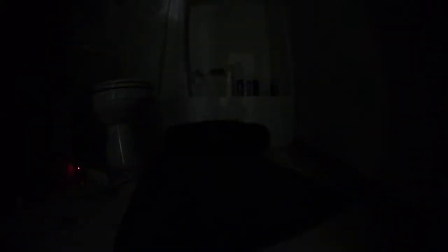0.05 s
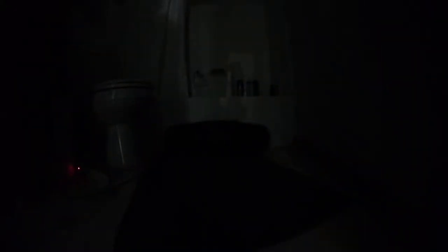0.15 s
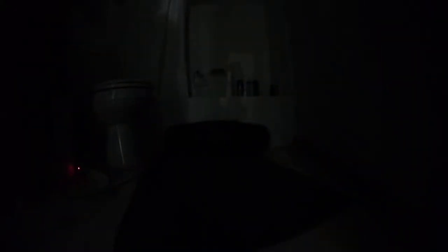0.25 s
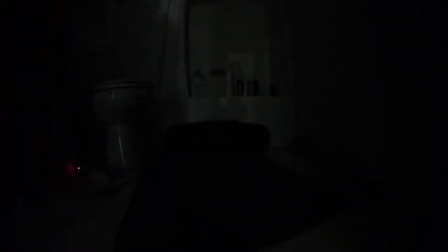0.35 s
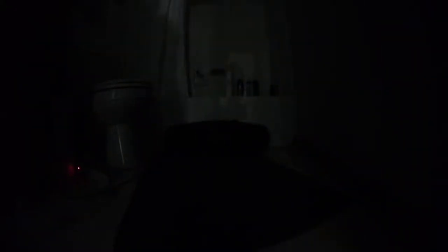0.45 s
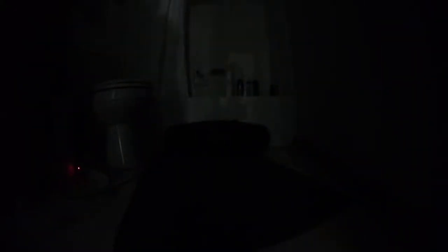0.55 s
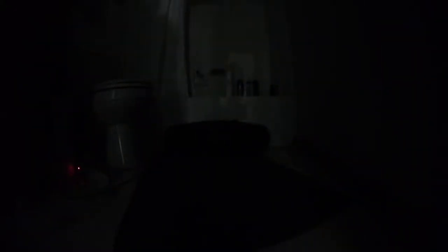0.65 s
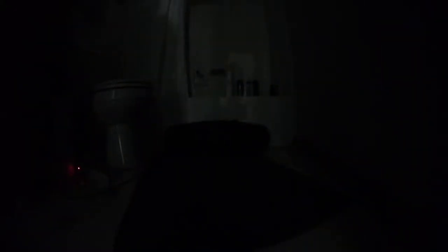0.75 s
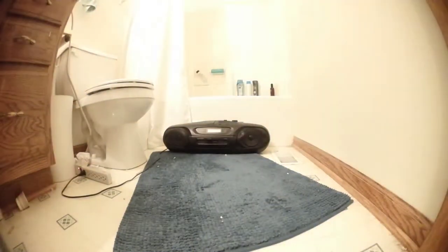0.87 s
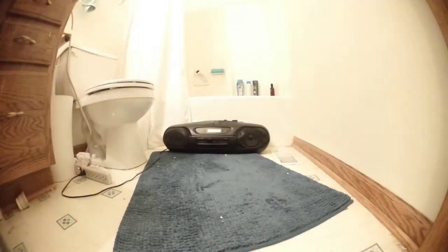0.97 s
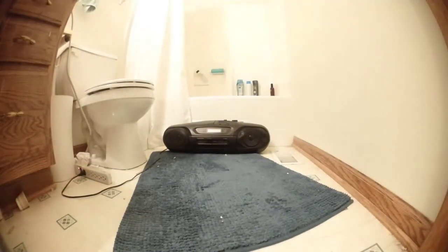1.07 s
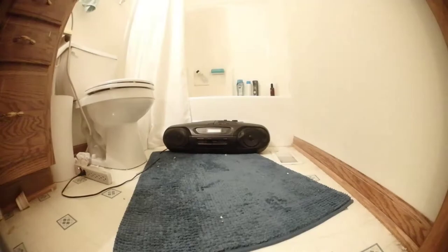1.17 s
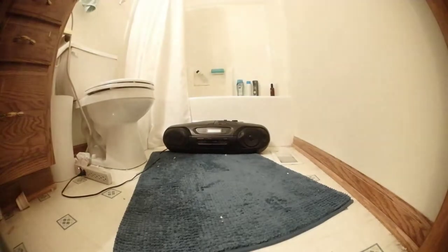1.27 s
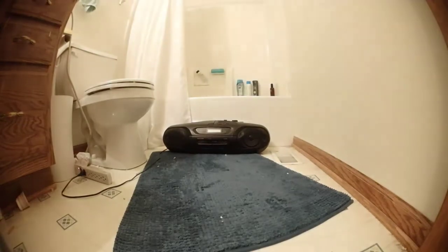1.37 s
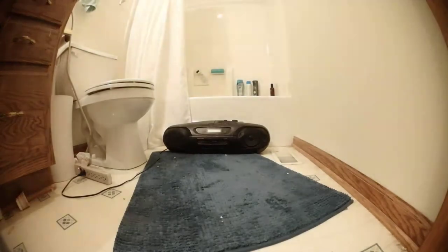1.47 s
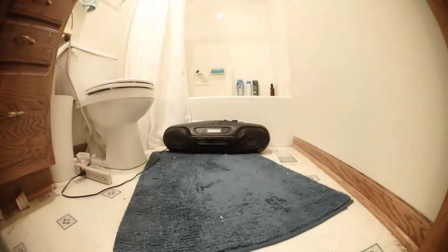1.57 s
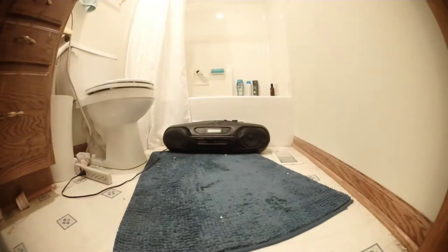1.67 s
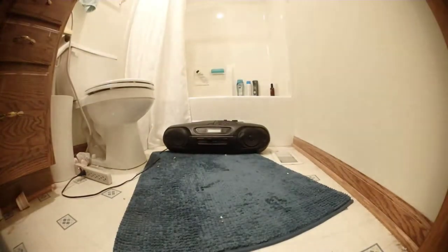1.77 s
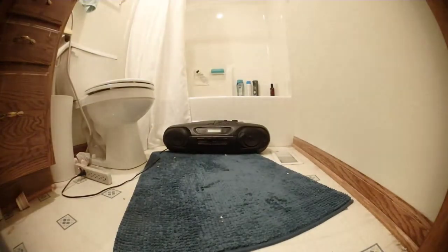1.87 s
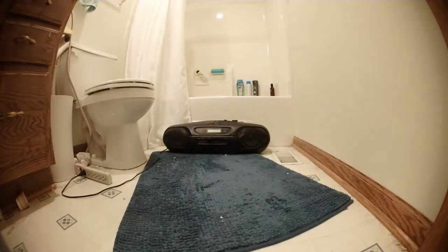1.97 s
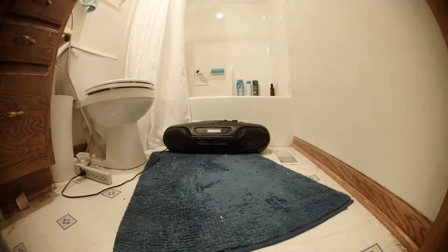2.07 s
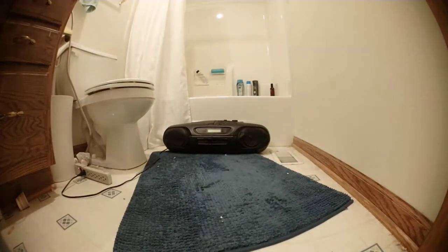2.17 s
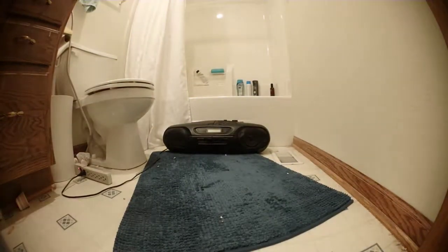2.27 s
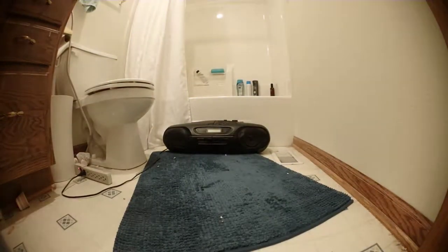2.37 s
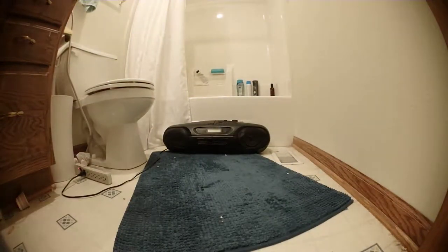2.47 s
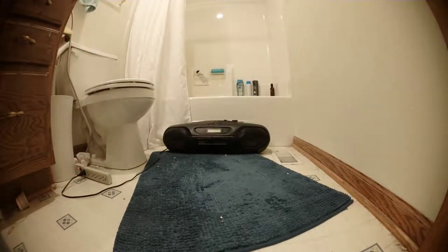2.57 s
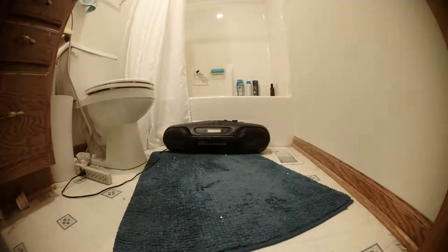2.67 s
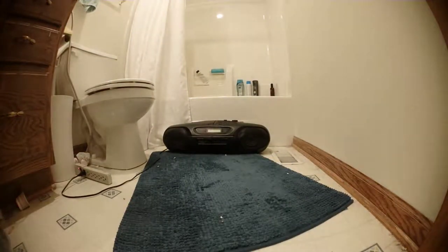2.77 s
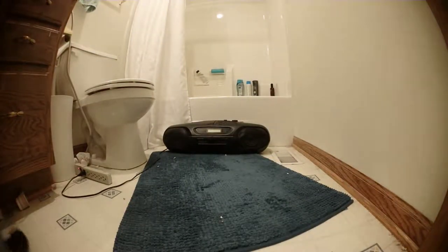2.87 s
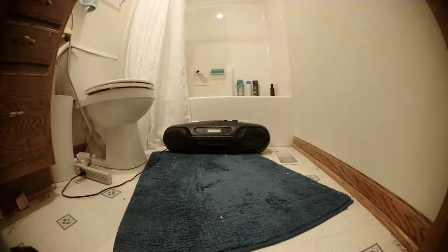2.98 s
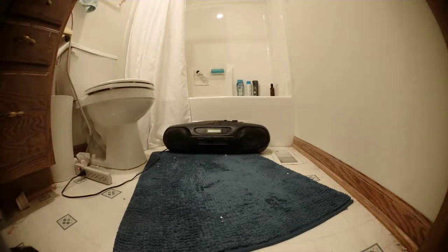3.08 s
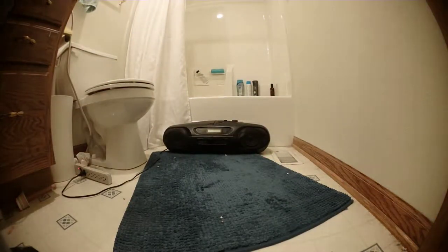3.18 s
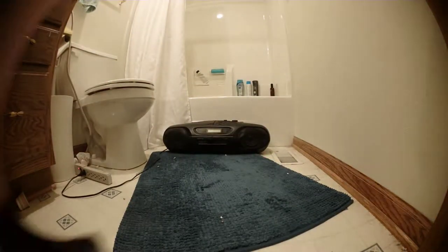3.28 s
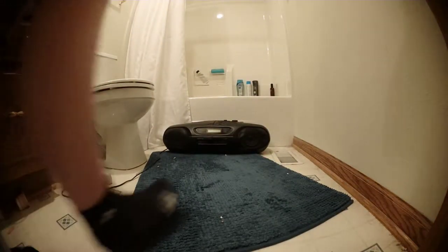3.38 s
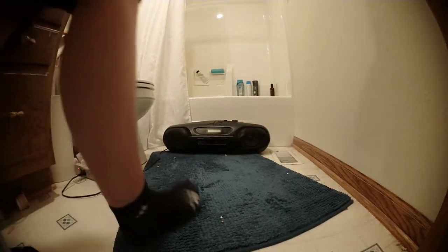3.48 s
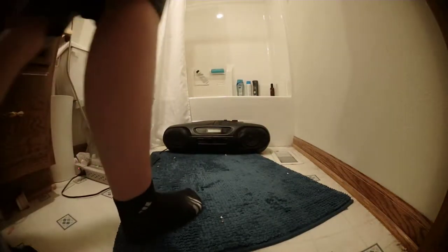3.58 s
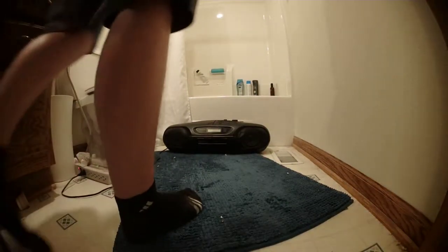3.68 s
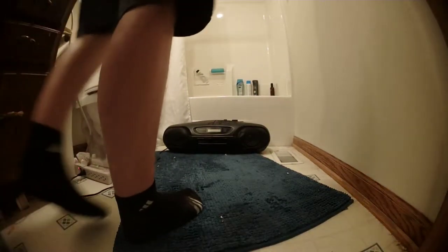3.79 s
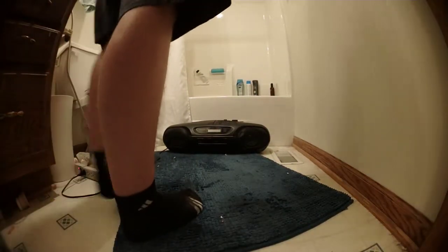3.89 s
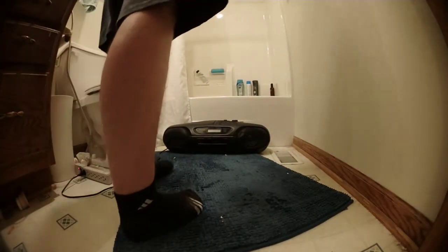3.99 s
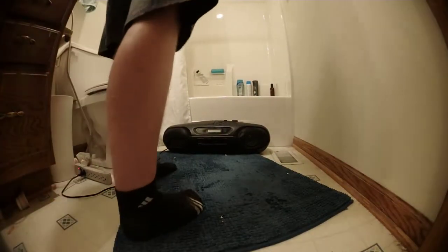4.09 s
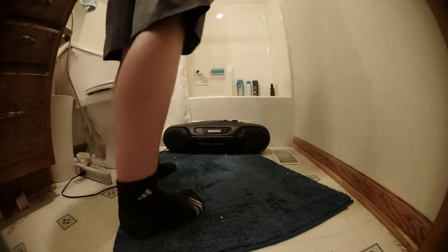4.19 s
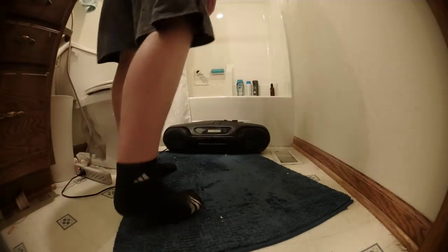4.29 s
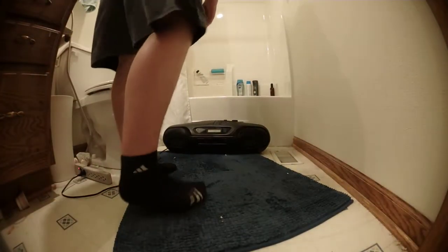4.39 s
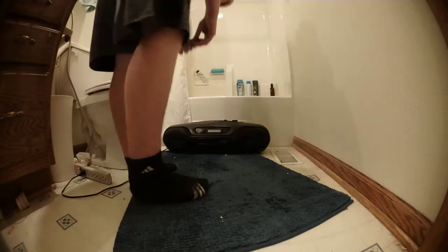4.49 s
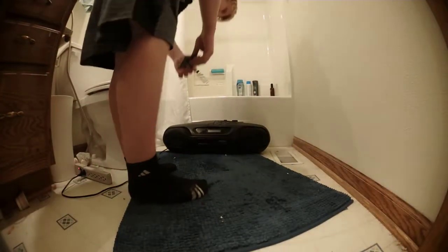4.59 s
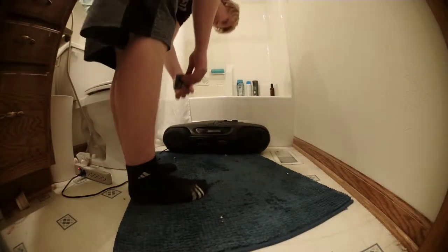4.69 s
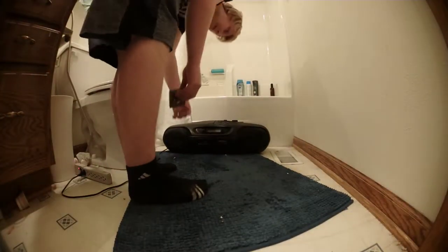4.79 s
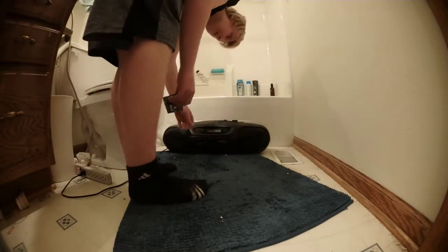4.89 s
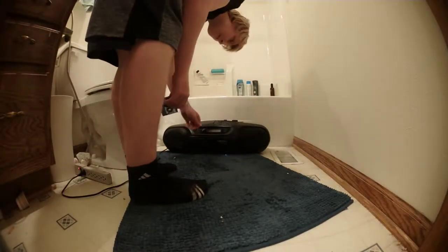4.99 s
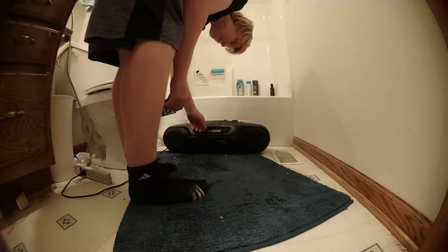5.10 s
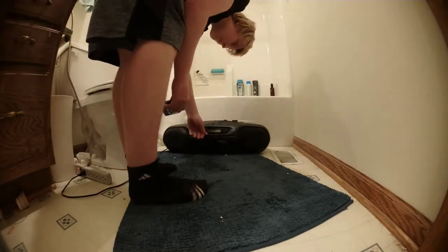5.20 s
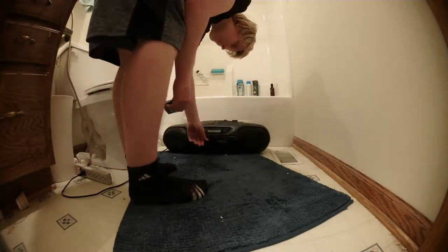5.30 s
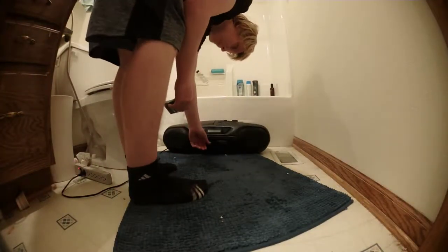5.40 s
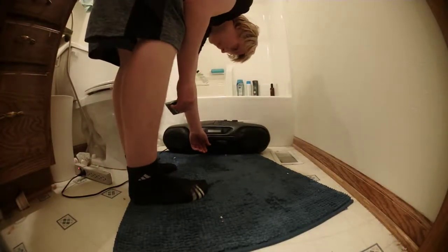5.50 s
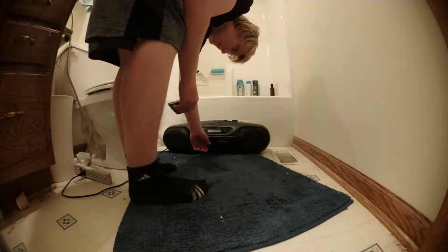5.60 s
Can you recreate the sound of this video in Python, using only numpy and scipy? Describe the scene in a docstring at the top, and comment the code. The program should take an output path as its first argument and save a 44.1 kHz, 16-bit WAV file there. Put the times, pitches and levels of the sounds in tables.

```python
"""A small tiled bathroom, heard from the floor: two hard plastic switches clack and the room rings.
Someone walks in on socks with rustling clothes and small clicks, then handles a plastic case.
Impacts are noise bursts with decaying reflections; the switches add decaying modes and the footfalls are damped sines.
Cloth and case are trains of tiny slips that follow the motion.
Under it lie a steady low rumble, hiss and a thin whine, made of filtered noise."""
import sys
import numpy as np
from scipy import signal
from scipy.fft import rfft, irfft
from scipy.io import wavfile
from scipy.ndimage import uniform_filter1d

SR = 44100
rng = np.random.default_rng(int(sys.argv[2]) if len(sys.argv) > 2 else 0)


def materialize(psi):
    """Save the field psi as 16-bit PCM at rate SR to the path in sys.argv[1].

    A 1-D psi becomes a single channel; in a 2-D psi each row is a channel.
    """
    bounded = np.clip(np.atleast_2d(psi).T, -1, 1)
    quanta = np.round(bounded * 32767).astype(np.int16)
    wavfile.write(sys.argv[1], SR, quanta)


N = 249165  # length in samples

# The two switches, a sharp one then a heavy one. Each row: time in seconds, level in dB, gain of the
# modes in dB, tilt of the modes in dB per octave, direct sound against reflections in dB, left-right in dB.
SWITCH_EVENTS = [(0.9206, -19, -24.5, 2, -5, 0.5), (1.555, -19, -19.5, 0, -9.5, 0.5)]
# Spectrum of the sharp clack. Each row: frequency in Hz, relative density in dB per Hz.
SHARP_SPECTRUM = [(50, -33), (130, -33), (310, -12.5), (440, -14), (760, -9.5), (1050, -10.5), (1450, 2),
                  (2350, -12), (3200, -8), (5400, -15), (7000, -30), (8600, -22), (9600, -34.5),
                  (13000, -41.5)]
# Spectrum of the heavy clack. Each row: frequency in Hz, relative density in dB per Hz.
HEAVY_SPECTRUM = [(50, -45), (120, -14), (300, -9), (430, -14.5), (640, -6.5), (1100, -8), (1480, 2.5),
                  (1820, -6), (2020, -16.5), (2850, -16), (3400, -10), (5600, -19.5), (6400, -34.5),
                  (8600, -33.5), (13000, -54)]
# Modes of wall and room after a clack. Each row: frequency in Hz, relative level in dB,
# 60 dB decay time in seconds (before the ceiling set in switches).
WALL_MODES = [(134, -12, 0.67), (306, -13.5, 0.27), (578, -4.5, 0.29), (623.6, -3, .38), (637.5, 1.5, 0.39),
              (648, -6.5, 0.24), (852, -5, 0.36), (947, -4, .38), (1142, -5.5, 0.31), (1258, -5.5, 0.36),
              (1261, -3, 0.34), (1422, -4, 0.48), (1458, 2, 0.19), (1496, 1, .2), (1505, -1.5, 0.22),
              (1680, -5, 0.17), (1764, 3, 0.14), (1840, -10, 0.14), (2100, -13.5, .2), (3300, -5, 0.24),
              (3440, -10.5, .32), (4160, -7, 0.26), (4662, -16.5, 0.19), (5340, -17, .22), (5480, -16, .18)]
# Small clicks of fingers, joints and plastic. Each row: time in seconds, level in dB, low edge in Hz,
# tilt in dB per octave, direct sound against reflections in dB, left-right in dB, resonance in Hz, its lift in dB.
CLICK_EVENTS = [ (0.199, -55, 4400, 5, -1.5, -2.5, 5540, 17),
                (0.251, -52.5, 1610, 2, -7.5, 0.5, 1820, 18.5), (0.889, -42, 1152, -8, -7.5, 0.5, 3480, 10),
                (2.403, -63, 1200, -4, -7, 0, 1430, 14), (2.613, -53.5, 1530, -0.5, 0.5, -3, 2250, -9),
                (2.743, -65, 1690, -9, -3, 9, 2000, 12), (3.131, -45, 1600, -3.5, 2.5, 1, 3310, 10),
                (3.2119, -43, 1080, -7, -4.5, 3.5, 1674, 15), (3.243, -61, 1320, -12, 8, 2, 1850, 11),
                (3.279, -55.5, 5000, 4, 3, 2, 8300, 10), (3.654, -55, 3100, 2, -10, 3, 3240, 17),
                (3.704, -40.5, 2070, 8, 1, 4, 3340, -3), (3.7662, -42.5, 1290, -4.5, -9, 1.5, 3324, 15.5),
                (3.93, -63, 2490, -5, -8, -1, 3340, 9), (4.207, -59.5, 1500, -5.5, -7, -3, 3700, 16),
                (4.403, -56.5, 3340, -7, -15, 2, 3750, 21), (4.7989, -41.5, 1240, -7, -5.5, 5, 1530, 10),
                (4.8059, -39.5, 1370, -6, -5, -1, 1660, -3), (4.8141, -37, 1450, -7, 3.5, 0.5, 2000, 3)]
# Spectrum that clicks share. Each row: frequency in Hz, relative density in dB per Hz.
CLICK_SPECTRUM = [(900, -4.5), (1200, -9.5), (1550, -2.5), (2100, 1), (2800, -6.5), (3300, -1.5), (4250, 2),
                  (4600, -5), (5300, -1.5), (6900, -14), (8500, -16), (9200, -26), (10000, -27.5),
                  (11500, -47)]
# The plastic case slides in the hand. Each row: start of full force in seconds, its length in seconds, level in dB.
CASE_SLIDES = [(4.122, 0.021, -59), (4.478, 0.085, -56)]
SLIDE_RISE_DB_PER_S, SLIDE_FALL_DB_PER_S = 272, 300
# The case catches and jerks free. Each row: time in seconds, level in dB.
CASE_CATCHES = [(4.505, -41), (4.533, -39.5)]
CATCH_RISE_DB_PER_S, CATCH_FALL_DB_PER_S = 650, 852
# Spectrum of the case. Each row: frequency in Hz, relative density in dB per Hz.
CASE_SPECTRUM = [(450, -29), (800, -20), (960, 2.5), (1170, -15.5), (1450, 3), (1700, -2), (2150, -6.5),
                 (2900, -14), (4150, -12), (4600, -17.5), (5400, -15.5), (7000, -32), (11000, -45)]
# Soft footfalls on the mat. Each row: time in seconds, relative level in dB, pitch in Hz, 60 dB decay time in seconds.
FOOTFALLS = [(3.046, -44.5, 238, 0.068), (3.083, -48.5, 195, 0.067), (3.636, -53.5, 59, 0.22),
             (3.662, -57.5, 77, 0.21), (3.668, -58, 162, 0.23)]
# Body movements that rub the clothes. Each row: start of full speed in seconds, time at full speed in seconds,
# relative level in dB.
BODY_MOVES = [(.17, 0.099, -61.5), (1.981, 0.048, -59.5), (2.21, .05, -68), (2.56, .06, -56.5),
              (2.87, 0.036, -63.5), (3.089, 0.27, -54), (3.702, 0.097, -51.5), (3.94, 0.043, -63.5),
              (4.16, 0.048, -61.5), (4.49, 0.35, -54.5), (5.02, 0.11, -67), (5.25, 0.031, -62),
              (5.51, 0.04, -69)]
SWELL_DB_PER_S, SETTLE_DB_PER_S = 117.5, 113.5  # every movement swells and dies away alike
# Spectrum of the rubbed cloth. Each row: frequency in Hz, relative density in dB per Hz.
CLOTH_SPECTRUM = [(700, -12.5), (1700, -8), (2400, -17.5), (3300, -10.5), (3800, -4.5), (4250, 5),
                  (4550, -18), (5000, 1), (5500, 0), (6200, -11.5), (7000, -16), (8500, -16.5), (9200, -27),
                  (13000, -33.5)]
# Spectrum of rumble and hiss. Each row: frequency in Hz, relative density in dB per Hz.
FLOOR_SPECTRUM = [(15, -62), (25, -23.5), (48, -17.5), (82, -12.5), (119, -2.5), (237, -4.5), (301, -7.5),
                  (666, -13), (2080, -25), (3010, -26), (3830, -30.5), (5400, -28.5), (6670, -39.5),
                  (11600, -29.5), (14000, -37.5)]
FLOOR_DB = -60.5
# The whine. The one row: frequency in Hz, half-width at half amplitude in Hz, level in dB.
WHINE_LINE = (11335, 70, -83.5)
# Reverberation of the room. Each row: frequency in Hz, 60 dB decay time in seconds.
ROOM_DECAY = [(100, 0.31), (300, 0.33), (700, 0.38), (1500, 0.28), (3000, 0.25), (5000, 0.26), (8500, 0.2),
              (12000, 0.075)]
# Left-right likeness of room sound. Each row: frequency in Hz, correlation from -1 to 1.
ROOM_LIKENESS = [(130, 1), (300, .92), (620, 0.84), (1340, 0.41), (2900, 0.14), (6300, -0.12),
                 (13000, 0.39)]
# Left-right likeness of the background. Each row: frequency in Hz, correlation from -1 to 1.
FLOOR_LIKENESS = [(60, 0.6), (280, 0.51), (620, .43), (1340, 0.13), (3000, 0.013), (6300, -0.12)]
# Unequal response of the two microphone ports. Each row: frequency in Hz, left-right in dB.
PORT_BALANCE = [(300, -1.5), (1230, 1.5), (2250, -1), (3300, -4), (4150, -3.5), (5400, -4.5), (7000, 0),
                (8600, 7), (11000, 7)]
EDGE_HZ = 13900  # upper band limit


def gain_of(db):
    """Logarithmic level: decibels to amplitude gain."""
    return 10 ** (np.asarray(db) / 20)


def evened(x):
    """Normalisation: scales to an rms of 1."""
    return x / np.sqrt(np.mean(x ** 2) + 1e-20)


def read(points, hz):
    """Interpolation of a table along a logarithmic frequency axis."""
    f, value = np.transpose(points)
    return np.interp(np.log(hz + 1), np.log(f), value)


def add(mix, s, sound):
    """Superposition: adds a stereo sound to the mix at time s."""
    part = mix[:, round(s * SR):][:, :sound.shape[-1]]
    part += sound[..., :part.shape[1]]


def panned(db):
    """Level difference: gains that set left above right by db."""
    return gain_of([[db / 2], [-db / 2]])


def low_cut(hz, edge_hz, order):
    """High-pass law: dB of a slope that falls below edge_hz as frequency to the power order / 2."""
    return -10 * np.log10(1 + (edge_hz / (hz + 1)) ** order)


def pair(size, likeness):
    """Partial coherence: white noise at two ports, correlated by frequency as the table says."""
    a, b = rfft(rng.standard_normal((2, size)))
    c = np.clip(read(likeness, np.fft.rfftfreq(size, 1 / SR)), -1, 1)
    return irfft(np.array([a, c * a + np.sqrt(1 - c ** 2) * b]), size)


def coloured(x, db_at, size=4096):
    """Minimum-phase filtering: a causal filter whose phase follows from its gain db_at(Hz)."""
    hz = abs(np.fft.fftfreq(size, 1 / SR))
    log_gain = np.log(gain_of(np.maximum(db_at(hz), -100)))
    spectrum = np.exp(np.conj(signal.hilbert(log_gain)))
    taps = np.fft.ifft(spectrum).real[:size // 2]
    return signal.oaconvolve(x, taps[None], axes=1)[:, :x.shape[1]]


def knock(db_at, direct_db, contact_s=0.00067, size=24576):
    """Impact and reverberation: a brief direct burst with dense reflections, each band decaying at its own rate."""
    hz, t, z = signal.stft(pair(size, ROOM_LIKENESS), SR, nperseg=256)
    decay = gain_of(-60 * t / read(ROOM_DECAY, hz)[:, None])
    tail = signal.istft(z * decay, SR, nperseg=256)[1]
    burst = pair(size, ROOM_LIKENESS) * np.exp(-np.arange(size) / SR / contact_s)
    blow = tail / np.linalg.norm(tail) + gain_of(direct_db) * burst / np.linalg.norm(burst)
    sound = coloured(blow, db_at)
    return sound / np.std(sound[:, :SR // 40])  # levels refer to the first 25 ms


def stroke(s, hold_s, db, rise_db_per_s, fall_db_per_s):
    """Exponential envelope of one gesture: it swells up to time s, holds, and dies away."""
    t = np.arange(N) / SR - s
    rise_db = rise_db_per_s * np.maximum(-t, 0)
    fall_db = fall_db_per_s * np.maximum(t - hold_s, 0)
    return gain_of(db - rise_db - fall_db)


def switches(swell_cycles=1.8, lead_s=.0017, lead_db=-16, bass_hz=110):
    """Impact excitation: the lever lets go, lands with a broad crack, and modes build up and outlast it."""
    out, t = np.zeros((2, N)), np.arange(SR) / SR
    hz, mode_db, t60 = np.transpose(WALL_MODES)[:, :, None]
    # the air and the walls soak up high modes sooner
    t60 = np.minimum(t60, .34 * (hz / 900) ** -.2 + .05)
    # short waves reach the ports out of step
    apart = np.arccos(np.clip(read(ROOM_LIKENESS, hz), -1, 1)) / 2
    spectra = (SHARP_SPECTRUM, HEAVY_SPECTRUM)
    for (s, db, ring_db, tilt_db, direct_db, pan_db), spectrum in zip(SWITCH_EVENTS, spectra):
        crack = knock(lambda f: read(spectrum, f) + low_cut(f, bass_hz, 2), direct_db)
        release = knock(lambda f: read(CLICK_SPECTRUM, f) + low_cut(f, 1500, 4), direct_db)
        add(out, s - lead_s, gain_of(db + lead_db) * release)
        add(out, s, gain_of(db) * panned(pan_db) * crack)

        phase = rng.uniform(0, 2 * np.pi, hz.shape)
        phase = phase + np.array([apart, -apart]) * rng.choice([-1, 1], hz.shape)
        sizes = gain_of(mode_db + tilt_db * np.log2(hz / 1000) - 60 * t / t60)
        sizes *= 1 - np.exp(-t * hz / swell_cycles)
        ring = (sizes * np.sin(2 * np.pi * hz * t + phase)).sum(1) / 2
        add(out, s, gain_of(ring_db) * panned(pan_db) * ring)
    return out


def clicks(edge_order=10, width_hz=40, contact_s=0.00045):
    """Radiation of small bodies: hard things radiate little below a low edge and ring at one resonance."""
    out = np.zeros((2, N))
    for s, db, edge_hz, tilt_db, direct_db, pan_db, ring_hz, lift_db in CLICK_EVENTS:
        def colour(f):
            ratio = (f + 1) / edge_hz
            resonance = gain_of(lift_db) ** 2 / (1 + ((f - ring_hz) / width_hz) ** 2)
            ring_db = 10 * np.log10(1 + resonance)
            tilt = tilt_db * np.log2(ratio)
            return read(CLICK_SPECTRUM, f) + ring_db + tilt + low_cut(f, edge_hz, edge_order)
        add(out, s, gain_of(db) * panned(pan_db) * knock(colour, direct_db, contact_s))
    return out


def case(slips_per_s=1500, direct_db=-3):
    """Stick-slip friction: quick slips of plastic, hardest where it catches, ring the case and then the room."""
    force = sum(stroke(*row, SLIDE_RISE_DB_PER_S, SLIDE_FALL_DB_PER_S) for row in CASE_SLIDES)
    force += sum(stroke(s, 0, db, CATCH_RISE_DB_PER_S, CATCH_FALL_DB_PER_S) for s, db in CASE_CATCHES)
    slips = force * evened(rng.standard_normal(N) * (rng.random(N) < slips_per_s / SR))
    ring = knock(lambda f: read(CASE_SPECTRUM, f), direct_db)
    ring /= np.linalg.norm(ring[0])
    return signal.oaconvolve(slips[None], ring, axes=1)[:, :N]


def steps(push_s=0.0033):
    """Damped oscillation: a padded heel sets the floor swinging, with a soft onset of time constant push_s."""
    out, t = np.zeros((2, N)), np.arange(SR // 2) / SR
    for s, db, hz, t60 in FOOTFALLS:
        swing = gain_of(db - 60 * t / t60) * np.sin(2 * np.pi * hz * t)
        add(out, s, 2 * swing * (1 - np.exp(-t / push_s)))
    return out


def clothes(level_db=-2, grains_per_s=900, spread_db=3, patchy_db=2.5):
    """Granular friction: fibres catch and slip over a hiss as the body moves; shifting folds change the colour."""
    powers = [stroke(*row, SWELL_DB_PER_S, SETTLE_DB_PER_S) ** 2 for row in BODY_MOVES]
    motion = np.sqrt(sum(powers))
    grain_db = spread_db * np.minimum(rng.exponential(1, (2, N)), 3)
    grains = gain_of(grain_db) * rng.choice([-1, 1], (2, N))
    grains *= rng.random((2, N)) < grains_per_s / SR
    hiss = pair(N, ROOM_LIKENESS)
    rub = coloured(evened(grains) + hiss, lambda f: read(CLOTH_SPECTRUM, f))

    # slow random gain over time and frequency
    z = signal.stft(rub, SR, nperseg=512)[2]
    folds = uniform_filter1d(rng.standard_normal(z.shape[1:]), size=3, axis=0)
    folds = uniform_filter1d(folds, size=14, axis=1)
    rub = signal.istft(z * gain_of(patchy_db * evened(folds)), SR, nperseg=512)[1][:, :N]
    return evened(rub) * gain_of(level_db) * motion


def background():
    """Stationary noise: room rumble and microphone hiss, with a thin electrical whine of narrow-band noise."""
    floor = evened(coloured(pair(N, FLOOR_LIKENESS), lambda f: read(FLOOR_SPECTRUM, f)))
    hz, width_hz, db = WHINE_LINE
    whine = coloured(rng.standard_normal((2, N)), lambda f: -20 * np.log10(1 + ((f - hz) / width_hz) ** 2))
    return gain_of(FLOOR_DB) * floor + gain_of(db) * evened(whine)


def scene():
    """Superposition of all sources, each port with its own response, over the background."""
    sounds = switches() + clicks() + case() + steps() + clothes()
    balance_db = read(PORT_BALANCE, np.fft.rfftfreq(N, 1 / SR))
    lean = gain_of(np.array([[.5], [-.5]]) * balance_db)
    lean = lean / np.sqrt((lean ** 2).mean(0))  # keeps the mean power of the two ports
    return irfft(rfft(sounds) * lean, N) + background()


def record(dry):
    """Band limitation: the recorder's linear-phase low-pass filter."""
    taps = signal.firwin(201, EDGE_HZ, window=("kaiser", 8), fs=SR)
    return signal.oaconvolve(dry, taps[None], "same")


dry = scene()
out = record(dry)
materialize(out)
```